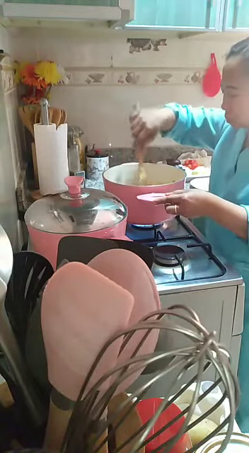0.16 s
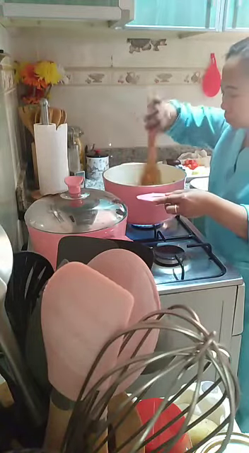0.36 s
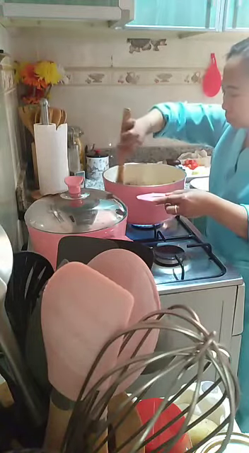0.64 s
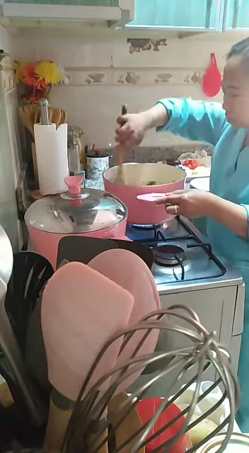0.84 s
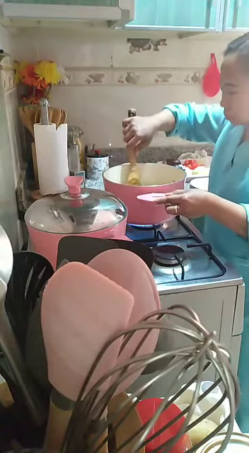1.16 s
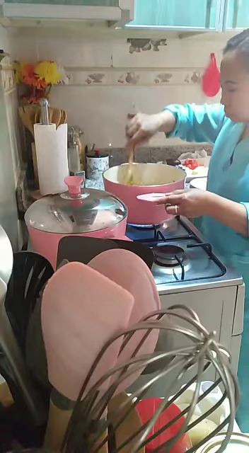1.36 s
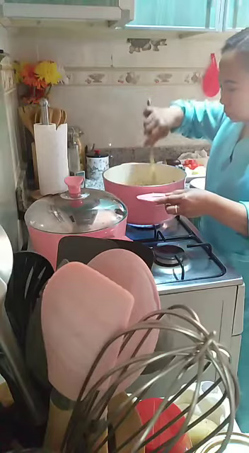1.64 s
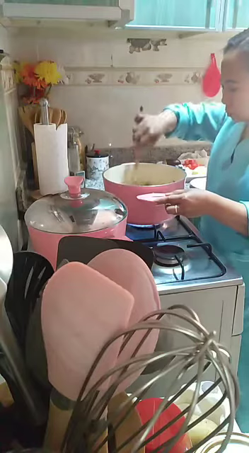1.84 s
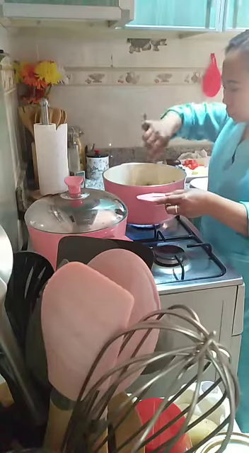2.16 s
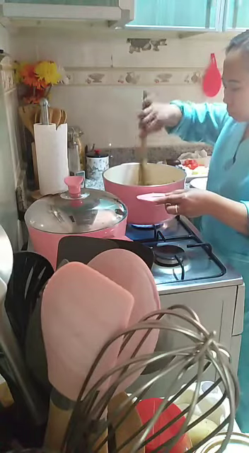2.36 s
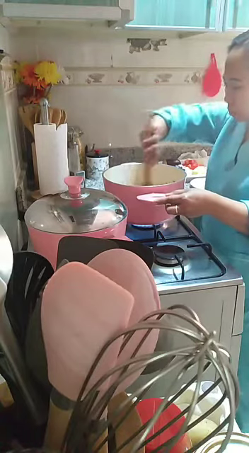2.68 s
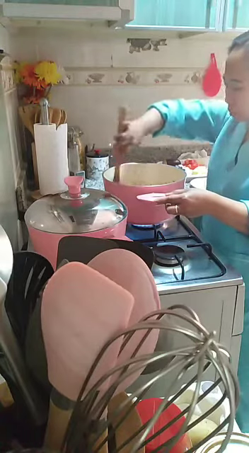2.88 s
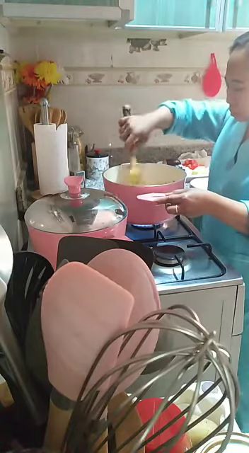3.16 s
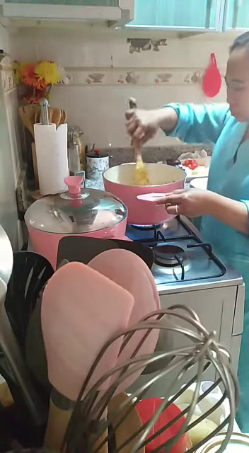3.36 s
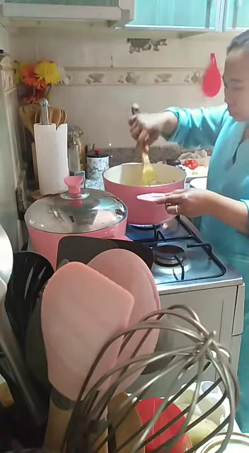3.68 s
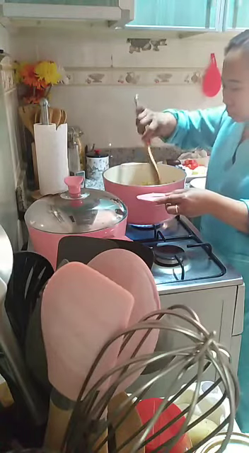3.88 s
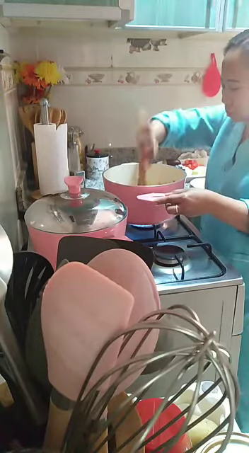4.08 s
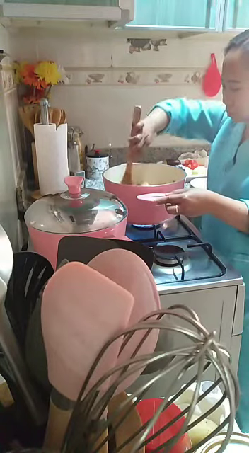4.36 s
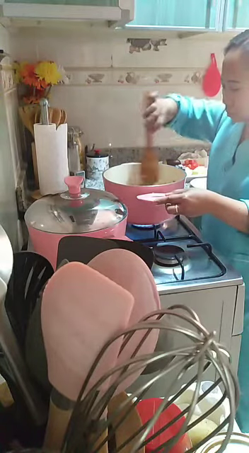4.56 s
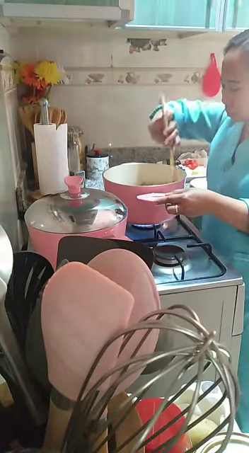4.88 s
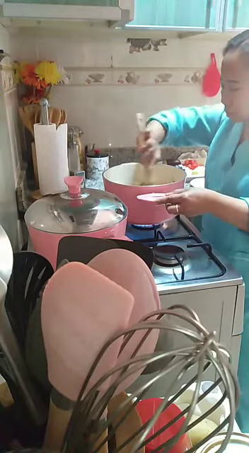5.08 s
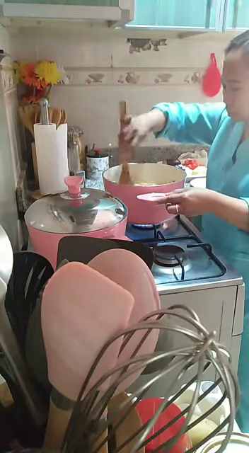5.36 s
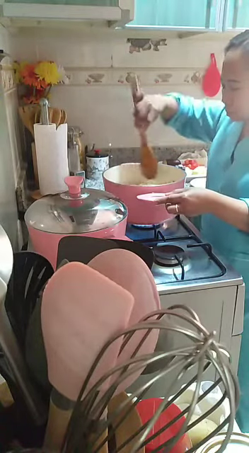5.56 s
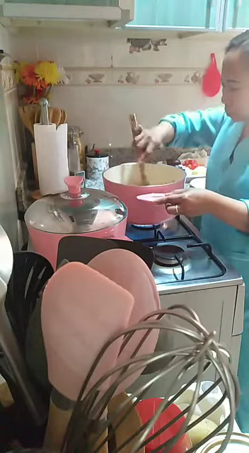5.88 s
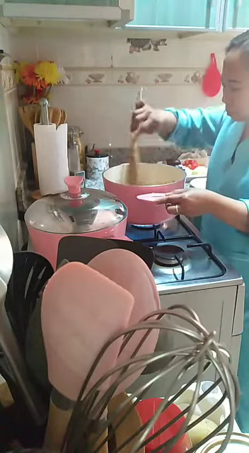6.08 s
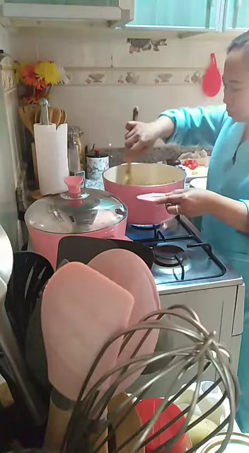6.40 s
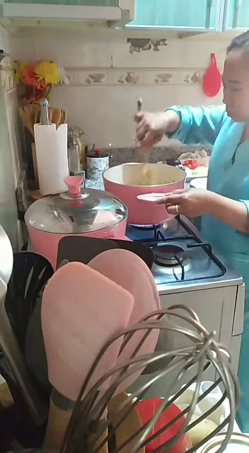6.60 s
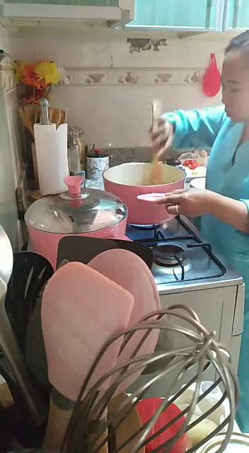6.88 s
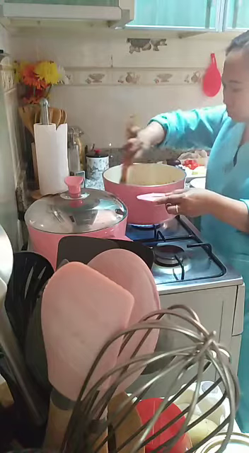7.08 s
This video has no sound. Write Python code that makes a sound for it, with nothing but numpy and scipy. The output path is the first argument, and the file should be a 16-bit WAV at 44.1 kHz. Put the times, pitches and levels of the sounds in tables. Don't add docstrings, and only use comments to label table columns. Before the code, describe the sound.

A seven-second stereo phone pickup of frying in a small kitchen, over quiet, low burner and room hum. At the start a bright sizzle is already high and falling; it surges again near 0.6-0.9, 1.35 and 1.75 seconds as a wooden spoon turns wet food. A light rim knock comes at 0.55, a solid, low knock at 1.75, another firm one at 2.05 with a sharp spit, then a short scrape at 2.2 and a weak tap at 2.55. Fizz flares at 2.2 and 2.75-3.2, then drops to a thin, patchy simmer with small steam spurts and crackling spits from 3.4 to 5. A faint tap falls at 4.1 and a dull bump at 5.05. A very sharp spit at 5.3 joins a flare and scrape; another stir, bumps and longer drag follow near 5.8. The sizzle fades, with a brief flare at 6.4 and a strong snap at 6.6.

```python
import sys
import numpy as np
from scipy import signal
from scipy.fft import rfft, irfft, next_fast_len
from scipy.io import wavfile
from scipy.ndimage import uniform_filter1d, minimum_filter1d

SR = 44100
rng = np.random.default_rng(int(sys.argv[2]) if len(sys.argv) > 2 else 0)


def file_out(sig):
    cols = np.atleast_2d(sig).T
    lim = np.clip(cols, -1, 1)
    pcm = np.round(lim * 32767).astype(np.int16)
    wavfile.write(sys.argv[1], SR, pcm)


def boost(x):
    u = np.asarray(x, float) / 20
    return 10 ** u


N = 319284
BINS = 512

# frequency in Hz, density in dB per Hz.
FIZZ_SPECTRUM = [(2650, -92), (4500, -35), (4830, -19), (5220, -28), (5590, -1.5), (6350, 0.5),
                 (6670, -0.5), (7210, 1.5), (8190, 5.5), (9810, -0.5), (12000, -40), (15600, -74),
                 (22000, -120)]
# frequency in Hz, lead of the left port in radians.
PORT_LEAD = [(25, 0), (100, -.15), (300, -.55), (780, -1.4), (1460, -4), (2670, -7.6), (5000, -14.2),
             (10000, -28.5)]


def unit(x):
    return x / np.sqrt(np.mean(x ** 2) + 1e-20)


def along(points, hz):
    f, v = np.transpose(points)
    return np.interp(np.log(hz + 1), np.log(f + 1), v)


def filtered(x, response):
    m = next_fast_len(x.shape[-1] + 8192)
    spectrum = rfft(x, m) * response(np.fft.rfftfreq(m, 1 / SR))
    return irfft(spectrum, m)[..., :x.shape[-1]]


def to_frames(x, bins):
    return signal.stft(x, SR, nperseg=bins, noverlap=bins * 3 // 4)


def from_frames(z, bins):
    return signal.istft(z, SR, nperseg=bins, noverlap=bins * 3 // 4)[1][:, :N]


def resonance(hz, centre_hz, width_hz, db):
    damping = 1j * hz * width_hz
    return abs(boost(db) * damping / (centre_hz ** 2 - hz ** 2 + damping))


def bands(table, hz):
    return sum(boost(db) * np.exp(-((hz - c) / w) ** 2) for c, w, db in table)


def port_phase(hz):
    return np.exp(.5j * along(PORT_LEAD, hz) * np.array([[1], [-1]]))


def panned(db, left_right_db):
    return boost(db + left_right_db * np.array([[.5], [-.5]]))


def pair(size, response):
    # frequency in Hz, likeness of the ports from 0 to 1.
    likeness = [(60, .94), (125, .96), (250, .86), (400, .7), (650, .8), (900, .35), (1500, .25),
                (3000, .25), (6000, .08)]

    def mid_side(hz):
        turn = np.arccos(np.clip(along(likeness, hz), 0, 1)) / 2
        return response(hz) * [np.cos(turn), np.sin(turn)]
    mid, side = filtered(rng.standard_normal((2, size)), mid_side)
    return unit(filtered(np.array([mid + side, mid - side]), port_phase))


def field(shape, frames):
    return unit(uniform_filter1d(rng.standard_normal(shape), size=frames, axis=2))


def kitchen():
    # frequency in Hz, density in dB per Hz.
    hum_spectrum = [(15, -57), (25, -27.5), (124, -5), (225, -5.5), (349, -5.5), (407, -8), (451, -5),
                    (718, -14.5), (1140, -13), (1770, -16.5), (5250, -36.5), (6290, -17), (7160, -32),
                    (8150, -20.5), (12000, -38), (15600, -66), (22000, -120)]
    # frequency in Hz, width in Hz, level in dB.
    hum_peaks = [(103, 17, -3), (173.6, 8.1, 7.5), (291.3, 6.7, 5), (702, 41, 11.5), (2150, 50, -48),
                 (2700, 127, 12)]
    level_db = -50 + 0.68

    def colour(hz):
        return boost(along(hum_spectrum, hz)) * (1 + sum(0.8 * resonance(hz, *peak) for peak in hum_peaks))
    z = to_frames(pair(N, colour), BINS)[2]
    slips_db = 8.4 * np.maximum(field((1,) + z.shape[1:], frames=18) - 1.5, 0)
    return boost(level_db) * unit(from_frames(z * boost(slips_db), BINS))


def knock(t, table, t60_s, heard_s):
    blow_s, push_hz, rattle = 0.00398, 1300, 0.08
    low = [(c, w, db) for c, w, db, _ in table if c < push_hz]
    high = [(c, w, db) for c, w, db, _ in table if c > push_hz]
    click = np.array([t == 0, t == 0]) * 1.
    push = filtered(click, lambda hz: port_phase(hz) * np.exp(-2j * np.pi * hz * blow_s) * bands(low, hz))
    noise = filtered(rng.standard_normal((2, len(t))), lambda hz: bands(high, hz))
    blow = push + rattle * boost(-60 * t / .04) * (t / blow_s) ** 1.3 * noise
    echo = pair(len(t), lambda hz: bands([(c, 1.07 * w, db) for c, w, _, db in table], hz))
    cut = 1 / (1 + np.exp(np.clip((t - heard_s) / .014, -40, 40)))
    onset = 1 - np.exp(-t / 0.0017)
    return (0.19 * unit(blow) + boost(-60 * t / t60_s) * cut * echo) * onset


def soft_note(t, note_hz, width_hz, lasts_s):
    swell = np.sin(np.pi * np.clip(t / lasts_s, 0, 1) ** 0.57)
    note = pair(len(t), lambda hz: bands([(note_hz, width_hz, 0)], hz))
    return unit(swell * note) * np.sqrt(lasts_s)


def spoon():
    # frequency in Hz, half width in Hz, blow in dB, echo in dB.
    rim = [(2007, 112, 7, -1.5), (2296, 200, -10, -7), (2860, 220, 8, -11.5), (3750, 260, -6, -9),
           (4440, 390, -4, -20), (6000, 570, -3, -24)]
    floor = [(614, 86, 3, -8), (1087, 50, -3, -18.5)]
    wall = [(950, 76, 0.5, -10), (1607, 123, -9, -1.5), (2123, 135, -5, -0.5), (2500, 260, -1, -3),
            (3000, 420, -5.5, -7.5), (3850, 500, -23, -14), (5500, 280, -12, -14), (6350, 350, -11, -12),
            (7020, 300, -3.5, -5.5)]
    edge = [(715, 51, 9.5, 0.5), (968, 48, 5, -5), (2110, 66, -13, -1.5), (2600, 360, -18, -7),
            (3900, 200, 3.5, -2), (4870, 150, -8, -10), (5970, 660, -2, -6)]
    tip = [(2210, 140, 0, -3), (2475, 110, -4, -2), (2810, 190, -2, -12.5)]
    # start in seconds, level in dB, t60 in seconds, heard for in seconds, left-right in dB.
    knocks = [
        (.556, -34, 0.63, 0.14, -0.5),
        (1.746, -24, 0.31, 0.2, 1),
        (2.06, -26.5, 0.9, 0.14, 2.5),
        (2.556, -37.5, 0.29, 0.12, -9),
        (4.098, -37.5, 0.59, .12, 4),
    ]
    # start in seconds, pitch in Hz, level in dB, length in seconds, left-right in dB.
    bumps = [(.306, 715, -51.5, 0.062, -13), (.875, 1196, -43, .069, -7), (.895, 2150, -53.5, .042, 11),
             (1.146, 1640, -53, 0.14, 7), (1.798, 2370, -51.5, .25, 0), (1.857, 1060, -49, 0.037, 15),
             (2.298, 3000, -45.5, 0.068, 1), (2.439, 604, -46.5, 0.036, -5), (2.96, 1880, -57, 0.04, -12),
             (3.195, 692, -48.5, 0.067, 8), (4.19, 2590, -48.5, 0.05, 7), (4.667, 1200, -50, 0.031, 15),
             (4.732, 723, -49.5, 0.073, -6), (5.05, 184, -38, 0.09, 2.5), (5.105, 463, -48.5, .05, 11),
             (5.742, 246, -41.5, .12, 0), (5.745, 1245, -52, 0.1, 1), (5.804, 1570, -48, 0.095, 6),
             (5.843, 4040, -47, 0.087, 4), (5.94, 2980, -53, 0.11, 8), (6.242, 2150, -57, .027, -10)]
    # start in seconds, pitch in Hz, level in dB, length in seconds, left-right in dB.
    scrapes = [
        (.84, 3240, -61, .22, -2),
        (2.193, 2500, -43.5, 0.095, 10),
        (5.288, 2600, -49.5, .15, 4.5),
        (5.756, 3160, -55.5, 0.27, 4),
    ]
    out, t = np.zeros((2, N + SR)), np.arange(SR // 2) / SR

    def add(start_s, gain, sound):
        start = round(start_s * SR)
        out[:, start:start + len(t)] += gain * sound
    for table, (s, db, t60_s, heard_s, pan_db) in zip((rim, floor, wall, edge, tip), knocks):
        add(s, panned(db, pan_db), knock(t, table, t60_s, heard_s))
    for s, note_hz, db, lasts_s, pan_db in bumps:
        width_hz = 85 * (note_hz / 1000) ** .4
        add(s, panned(db, pan_db), soft_note(t, note_hz, width_hz, lasts_s))
    for s, note_hz, db, lasts_s, pan_db in scrapes:
        add(s, panned(db, pan_db), soft_note(t, note_hz, .22 * note_hz, lasts_s))
    return out[:, :N]


def spits():
    # start in seconds, peak in dB.
    pops = [(0.7208, -29), (0.756, -24), (2.0622, -18), (2.556, -19), (2.6913, -30), (3.4476, -28),
            (3.7878, -26), (3.929, -17.5), (4.0437, -28), (4.2737, -25), (4.4069, -23), (4.5575, -18),
            (4.5989, -27), (4.6558, -23), (4.6957, -27), (4.9312, -31), (4.9671, -32), (5.0694, -20),
            (5.2842, -11), (5.7409, -24), (5.9439, -23.5), (6.3674, -27), (6.4004, -33), (6.4263, -30),
            (6.6177, -14.5), (6.8598, -27)]
    out, t = np.zeros((2, N + SR)), np.arange(400) / SR
    for s, db in pops:
        start = round(s * SR)
        out[:, start:start + len(t)] += boost(db - 60 * t / 0.025) * rng.standard_normal((2, len(t)))
    peak_db = max(db for _, db in FIZZ_SPECTRUM)
    return boost(-6.5) * filtered(out[:, :N], lambda hz: boost(along(FIZZ_SPECTRUM, hz) - peak_db))


def peaked(t, s, db, rise, fall):
    return boost(db - 10 * np.maximum((s - t) / rise, (t - s) / fall)) ** 2


def effort(t):
    # time in seconds, level in dB.
    simmer = [(0, -41), (1.51, -42), (2.5, -42), (3.4, -46), (3.86, -42.5), (4.0, -53.5), (4.21, -46.5),
              (4.76, -60), (5.19, -44), (5.64, -57.5), (6.36, -64), (7.24, -47.5)]
    # peak time in seconds, level in dB,
    # rise in seconds per 10 dB, fall in seconds per 10 dB, low spatter in dB.
    stir_table = [(0.115, -28, 4, 0.24, -16.5), (0.61, -34.6, 0.1, 0.3, -9), (0.867, -26, 0.114, 0.7, -8.5),
                  (1.345, -34, 0.66, 1.5, -17.5), (1.738, -27.5, 0.1, 0.65, -17),
                  (2.207, -27.5, 0.1, 0.19, -6), (2.762, -31.5, 0.18, 0.8, -10),
                  (2.99, -29.3, 0.045, 0.4, -11), (3.182, -29.5, 0.13, 0.083, -17),
                  (3.619, -43, 0.379, 0.114, -39.4), (4.482, -39, 0.47, 0.3, -11),
                  (4.974, -39, 0.15, 0.5, -14), (5.353, -29.5, 0.1467, 0.11, -9.5),
                  (5.784, -32, 0.0352, 0.32, -22), (5.996, -40.5, 0.04, 0, -20.1),
                  (6.407, -36.1, 0.037, 0.4, -50), (6.634, -40.5, 0.28, 0.08, -30)]
    # peak time in seconds, level in dB.
    spurt_table = [(2.077, -33), (2.585, -35), (3.474, -37.5), (3.816, -42.5), (3.926, -41), (4.076, -41.5),
                   (4.303, -38), (4.424, -34.5), (4.564, -43), (4.698, -44), (4.884, -42.5), (5.088, -37),
                   (6.116, -46), (6.85, -44.5), (7.044, -49), (7.27, -41)]
    dries_s, dries_db_per_s = 0.18, 38
    simmer_db = np.interp(t, *np.transpose(simmer))
    _, top_db, _, _, wet_db = np.transpose(stir_table)
    stirs = np.array([peaked(t, s, -dries_db_per_s * np.maximum(t - s - dries_s, 0), rise, fall)
                      for s, _, rise, fall, _ in stir_table])
    spurts = sum(peaked(t, s, db, 0.035, 0.064) for s, db in spurt_table)

    fizz = boost(2 * simmer_db) + boost(2 * top_db) @ stirs + spurts
    spatter = boost(2 * -57.5) + boost(2 * (top_db + wet_db)) @ stirs ** 1.46 + boost(2 * -19) * spurts
    simmer_hiss_db = -2.5 - 42 + 1.73 * (simmer_db + 42)
    stir_hiss_db = top_db - 12 - .19 * wet_db
    hiss = boost(2 * simmer_hiss_db) + boost(2 * stir_hiss_db) @ stirs + boost(2 * -29) * spurts
    return 10 * np.log10([fizz, spatter / fizz, hiss / fizz])


def frying():
    # frequency in Hz, density in dB per Hz.
    spatter_spectrum = [(1200, -30), (1900, -27), (2500, -2.5), (3200, -2.5), (4500, 3), (5300, 6),
                        (6200, -19.5)]
    hiss_spectrum = [(9000, -18.5), (10500, -0.5), (12000, -7.5), (14300, -10), (15000, -88)]
    chance, size_db = rng.random(N), np.minimum(rng.exponential(size=N), 4)
    clicks = (chance < .02) * boost(size_db)
    busy = np.sqrt(np.abs(uniform_filter1d(clicks ** 2, size=24)))
    source = rng.standard_normal((2, N)) * (1 + 0.13 * unit(busy))

    hz, t, z = to_frames(source, BINS)
    fizz_db, spatter_db, hiss_db = effort(t)
    flutter_db = field((1, 1, len(t)), frames=8)
    streaks = unit(.6 * field(z.shape, frames=20) + field((1,) + z.shape[1:], frames=24))
    layers = ((FIZZ_SPECTRUM, 0 * t, .1), (spatter_spectrum, spatter_db, -.6), (hiss_spectrum, hiss_db, -.1))
    total = 0
    for colour, db, margin in layers:
        opening = margin + .11 * (fizz_db + 36) + streaks
        passed = boost(-20) + 1 / (1 + np.exp(-8 * opening))
        shape = boost(along(colour, hz))[:, None] * passed * boost(3.5 * streaks)
        total = total + boost(db) * shape / np.sqrt(np.mean(shape ** 2, axis=(0, 1)))
    return from_frames(z * total * boost(fizz_db + flutter_db - 3.0), BINS)


def scene():
    return kitchen() + spoon() + spits() + frying()


def ports(hz):
    # frequency in Hz, left-right in dB.
    balance = [(60, -1.5), (91, -1.5), (140, -0.5), (210, 0.0), (320, -2.5), (490, -4.0), (750, 0.5),
               (1140, 2.0), (1740, 0.5), (2650, 2.5), (4030, 0.0), (6150, 0.5), (9360, 12.0), (14300, 5.5)]
    # frequency in Hz, width in Hz, level in dB.
    port_rings = [(8190, 820, 7), (6810, 300, 12)]
    right = 1 / (1 + boost(along(balance, hz)) ** 2)
    ring = [1 + 0.37 * resonance(hz, *row) for row in port_rings]
    return np.sqrt(2 * np.array([1 - right, right])) * ring


def masked_bands_emptied(x):
    # frequency in Hz, level in dB.
    unheard = [(9000, -106), (11000, -96), (12500, -90), (14300, -86)]
    # frequency in Hz, level relative to them in dB.
    masked = [(800, -26), (1400, -15), (2300, -6.5), (3200, -6.5), (5000, -6), (7000, -8.5), (10000, -12.5),
              (14000, -23)]
    bins, top_hz = 1024, 14340
    hz, _, z = to_frames(x, bins)
    power = np.mean(np.abs(z[:, :-3]).reshape(2, 170, 3, -1) ** 2, axis=2)
    power = 0.54 * power + 0.93 * power[::-1]
    level_db = 10 * np.log10(uniform_filter1d(power, size=7, axis=2) + 1e-16)
    nearby_db = -minimum_filter1d(-level_db, size=5, axis=1)
    busy_db = .22 * (10 * np.log10(power.mean(axis=(0, 1))) + 68)
    centre_hz = hz[1:-3:3]
    masked_db = nearby_db + uniform_filter1d(busy_db, size=9) + along(masked, centre_hz)[:, None]
    limit_db = np.maximum(masked_db, along(unheard, centre_hz)[:, None])
    kept = 1 / (1 + np.exp(np.clip(3 * (limit_db - level_db), -30, 30)))
    kept = np.pad(np.repeat(kept, 3, axis=1), ((0, 0), (0, 3), (0, 0)))
    return from_frames(z * kept * (hz < top_hz)[:, None], bins)


def low_pass(x):
    return signal.sosfilt(signal.butter(12, 14860, fs=SR, output="sos"), x)


def record(dry):
    mix = masked_bands_emptied(filtered(dry, ports))
    return low_pass(mix)


dry = scene()
out = record(dry)
file_out(out)
```